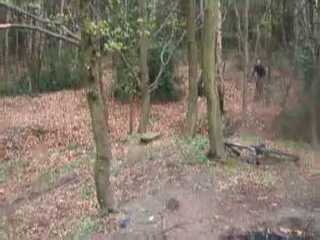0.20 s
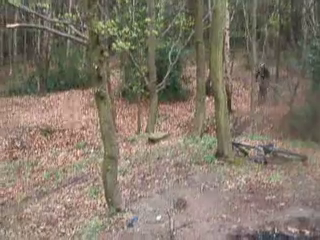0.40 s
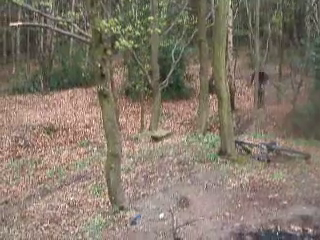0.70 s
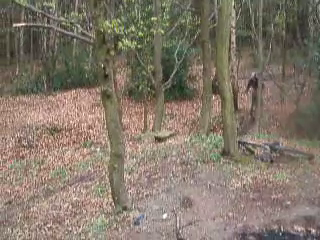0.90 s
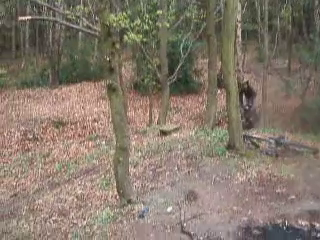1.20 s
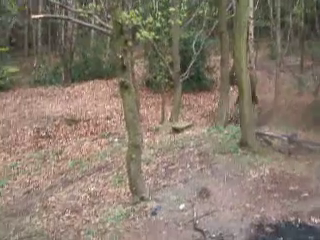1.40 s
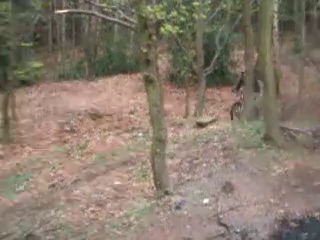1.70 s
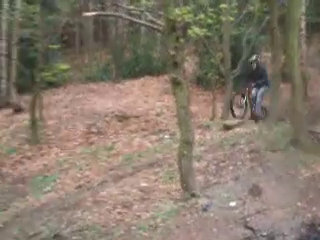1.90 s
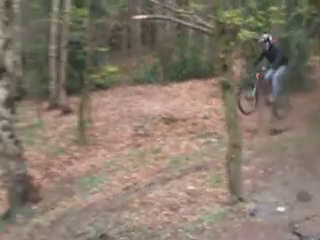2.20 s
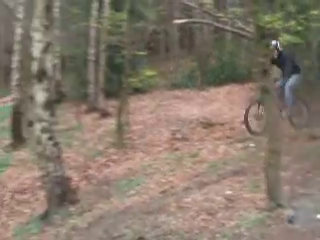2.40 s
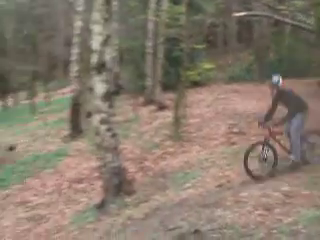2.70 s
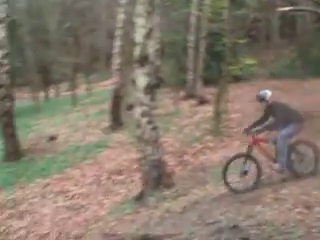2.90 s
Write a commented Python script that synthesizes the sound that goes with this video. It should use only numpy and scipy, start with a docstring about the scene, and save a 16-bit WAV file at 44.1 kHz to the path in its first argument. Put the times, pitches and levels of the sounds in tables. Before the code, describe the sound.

Quiet outdoor rumble with far birds and a low hum, soft leaf rustle midway, then near the end a bike smacks down, clacking and crunching leaves as it rolls on; hissy, muffled-treble microphone outdoors.

```python
"""A mountain bike rolls along a woodland trail and lands hard on dry leaves and soil.
The bike clacks as decaying metal modes; leaves and twigs are dense crackle and short bright noise bursts.
Breeze and tyres together are low wavering noise, with banded noise thuds where the soil takes the weight.
A bird's warbled call and a few whistles are swept sines blurred by echoes among the trees.
Behind them lie a two-partial drone, a deep murmur of noise and a steady, faint, nearly white hiss."""
import sys
import numpy as np
from scipy import signal
from scipy.fft import rfft, irfft, next_fast_len
from scipy.io import wavfile
from scipy.ndimage import uniform_filter1d, map_coordinates

SR = 44100
rng = np.random.default_rng(int(sys.argv[2]) if len(sys.argv) > 2 else 0)


def store_pcm(level_fs):
    """Save levels as 16-bit WAV."""
    pcm = np.round(np.clip(level_fs, -1, 1) * 32767).astype(np.int16)
    wavfile.write(sys.argv[1], SR, np.atleast_2d(pcm).T)


N = 133623

# knocks of the bike's frame and chain [t/s, level/dB]
BIKE_KNOCKS = [(2.075, -33.5), (2.084, -38.5), (2.8783, -13), (2.8800, -29), (2.8835, -27), (2.8888, -26)]
# ringing modes of the bike [f/Hz, level/dB, t60/s]
BIKE_MODES = [(1080, -14, 0.0088), (1660, -3.5, 0.01), (1906, -11, .014), (2143, -6.5, 0.012),
              (2440, -4, 0.012), (2730, -11, 0.0059), (3346, -6, 0.016), (3550, -8.5, 0.0097),
              (4500, -26, .03), (5270, -25.5, 0.036), (7100, -19, 0.011)]

# leaves stirred on the run-in [t/s, level/dB]
RUN_IN_RUSTLE = [(0.1, -80), (0.7, -60), (0.94, -55.5), (1.18, -57), (1.38, -51.5), (1.64, -52),
                 (1.85, -63.5), (2.04, -51), (2.12, -45.5), (2.18, -52), (2.35, -60), (2.78, -69.5)]
# tyres pressing into the leaves [t/s, level/dB, attack/s, hold/s, t60/s]
LEAF_CRUNCHES = [(2.798, -31, 0.0059, 0.022, 0.11), (2.844, -35.5, 0.0045, 0.011, 0.089),
                 (2.866, -37.5, .003, 0.02, 0.14), (2.932, -38.5, 0.044, 0.015, 0.093)]
# colour of breaking leaves [f/Hz, level/dB]
LEAF_COLOUR = [(200, -28), (600, -3), (1200, -8.5), (2400, -1), (3300, -3.5), (4500, -0.5), (5800, -4.5),
               (7200, -3), (8500, -9)]
ROLL_OUT_DB, ROLL_OUT_HOLD_S, ROLL_OUT_T60_S = -39, .15, 0.89
# twigs and dry leaves snapping [t/s, level/dB]
TWIG_SNAPS = [(0.9297, -44.5), (1.0135, -44.5), (2.119, -38), (2.382, -43), (2.388, -45), (2.5767, -45.5),
              (2.8063, -28), (2.807, -45), (2.966, -38.5), (2.981, -34)]

# low outdoor rumble, breeze and distant tyres together [t/s, level/dB]
RUMBLE_LEVEL = [(0.08, -44.5), (0.3, -46), (0.6, -44.5), (0.69, -47), (0.8, -46.5), (1.0, -48.5),
                (1.1, -45.5), (1.3, -43.5), (1.55, -46), (1.75, -47.5), (1.98, -45.5), (2.08, -46),
                (2.2, -46), (2.4, -49), (2.78, -50)]
# colour of the rumble and the close rolling [f/Hz, level/dB]
TRAIL_COLOUR = [(30, -25), (80, -19), (125, -11.5), (165, -7.5), (215, -1), (275, .5), (350, -6.5),
                (430, -5), (560, -8), (780, -11.5), (1200, -20), (2500, -39.5), (6000, -33.5)]
# soil taking the weight of the bike [t/s, level/dB, centre f/Hz, t60/s]
SOIL_THUDS = [(0.66, -41, 350, .4), (0.726, -46.5, 170, 0.5), (0.89, -44.5, 182, 0.65),
              (2.051, -40.5, 370, 0.31), (2.799, -44, 420, 0.16), (2.88, -41.5, 200, 0.18),
              (2.883, -37, 780, 0.044)]
# colour of a thud [multiple of its centre frequency, level/dB]
THUD_COLOUR = [(.2, -38), (.55, -14), (.85, 11.5), (1.2, 2), (1.9, -3.5), (4, -30), (12, -46)]
TOUCHDOWN_S, LANDED_ROLL_DB = 2.8, -51.5

# the bird's repeated call [t/s, f/Hz, level/dB], before the note's shape is applied
BIRD_CALLS = [(1.259, 3150, -50.5), (1.598, 3183, -51.5), (2.003, 3134, -53), (2.434, 3150, -55.5)]
# shape of one call [t/s from its start, pitch ratio, level/dB added]
CALL_SHAPE = [(0, 1.03, -11), (.018, 1.05, 4), (.034, .95, -6.5), (.052, .93, -0.5), (0.071, 1.005, 2),
              (0.113, 1.0, -1.5), (.135, .91, -3.5), (.165, .89, -14.5)]
# single whistles [t/s, f/Hz, length/s, level/dB, pitch flutter as a share]
BIRD_WHISTLES = [(0.865, 2710, .28, -55.5, .032), (0.953, 2793, 0.1, -59, .04),
                 (2.303, 4620, 0.15, -67, .01), (2.56, 3820, 0.1, -64, .01)]
TRILL_HZ, TRILL_DEPTH = 151, .03  # depth as a share of the pitch
BIRD_ECHO_T60_S = 1

# distant drone [t/s, level/dB]
DRONE_LEVEL = [(0.08, -47.5), (0.22, -53), (0.34, -55), (0.48, -57), (0.6, -76), (0.9, -56.5),
               (1.07, -52.5), (1.3, -50.5), (1.65, -55), (1.98, -52), (2.08, -60.5), (2.3, -54.5),
               (2.5, -61), (2.7, -62), (3.0, -52.5)]
DRONE_HZ, OCTAVE_DB = 105, -9
# colour of the deep outdoor murmur [f/Hz, level/dB]
MURMUR_COLOUR = [(20, -2), (45, -4), (90, -8.5), (200, -33.5), (1000, -74.5)]
MURMUR_DB = -73

# colour of the steady background hiss [f/Hz, level/dB]
HISS_COLOUR = [(100, -9), (1000, 1), (3000, 0.5), (5000, 0), (7500, -1.5), (9000, -4.5)]
HISS_DB = -52
# treble roll-off of the recorder [f/Hz, gain/dB]
TREBLE_ROLL_OFF = [(7200, 0), (7800, -4.5), (8300, -9.5), (8800, -23), (9100, -37.5)]
START_S, TOP_HZ = .0725, 9050  # silent up to START_S, nothing from TOP_HZ up


def amp(db):
    """Decibels to gain."""
    return 10 ** (np.asarray(db) / 20)


def unit(x):
    """Scale to rms 1."""
    return x / np.sqrt(np.mean(x ** 2) + 1e-20)


def clock():
    """Seconds at each sample."""
    return np.arange(N) / SR


def level(rows):
    """Gain per sample, gliding in dB between [t/s, level/dB] points."""
    return amp(np.interp(clock(), *np.transpose(rows)))


def wobble(rate):
    """A smooth random curve, rate knots a second."""
    return map_coordinates(rng.standard_normal(2048), [clock() * rate], mode="wrap")


def colour(x, points):
    """Filter x by [f/Hz, level/dB] points joined on a log frequency axis."""
    m = next_fast_len(N + SR // 2)
    f, db = np.transpose(points)
    log_f = np.log(np.fft.rfftfreq(m, 1 / SR) + 1)  # the 1 Hz avoids log(0)
    gain = amp(np.interp(log_f, np.log(f), db))
    return irfft(rfft(x, m) * gain, m)[:N]


def noise(points):
    """Coloured noise of rms 1."""
    return unit(colour(rng.standard_normal(N), points))


def fade(t, t60):
    """Exponential decay from t = 0, down 60 dB after t60 seconds."""
    return np.exp(-np.log(1000) * np.maximum(t, 0) / t60)


def envelope(s, attack, hold, t60):
    """Rise from time s, hold and die away."""
    t = clock() - s
    return np.clip(t / attack, 0, 1) * fade(t - attack - hold, t60)


def woods(x, t60):
    """Echoes scattered by the trunks: a decaying noise tail with a soft onset."""
    t = np.arange(SR) / SR
    tail = rng.standard_normal(SR) * fade(t, t60) * (1 - np.exp(-t / .01))
    return signal.fftconvolve(x, tail / np.linalg.norm(tail))[:N]


def bike():
    """Each knock rings the same heavily damped modes, alternating in polarity, under a short noise crack."""
    out = np.zeros(N + SR)
    t = np.arange(SR // 8) / SR
    for s, db in BIKE_KNOCKS:
        ring = np.zeros(len(t))
        for k, (hz, mode_db, t60) in enumerate(BIKE_MODES):
            gain = (-1) ** k * amp(mode_db + rng.normal(0, 1))  # modes vary a little per knock
            ring += gain * np.sin(2 * np.pi * hz * t) * fade(t, t60)
        grit = noise([(300, -15), (1200, -3), (3400, -3), (4500, -16), (9000, -29)])[:len(t)]
        crack = amp(-8) * fade(t, 0.0044) * grit
        start = round(s * SR)
        out[start:start + len(t)] += amp(db) * (ring + crack)
    return out[:N]


def crackle(per_s, spread_db, dust_db):
    """Many tiny leaf fractures of uneven size over a fine rustle, rms 1."""
    struck = rng.random(N) < per_s / SR
    size = amp(spread_db * np.minimum(rng.exponential(size=N), 3))
    cracks = struck * rng.choice([-1, 1], N) * size
    dust = amp(dust_db) * rng.standard_normal(N)
    return unit(colour(unit(cracks) + dust, LEAF_COLOUR))


def patchy(x, depth_db):
    """Each clump of leaves has its own colour for a few milliseconds."""
    z = signal.stft(x, nperseg=256)[2]
    field = uniform_filter1d(rng.standard_normal(z.shape), size=5, axis=0)  # across frequency
    field = uniform_filter1d(field, size=3, axis=1)  # across time
    gain = unit(amp(depth_db * unit(field)))
    return signal.istft(z * gain, nperseg=256)[1][:N]


def leaves():
    """Leaf fractures make a far rustle on the run-in, crunches under the tyres and a crackling roll-out."""
    far_sway = amp(1.5 * wobble(44.72))
    far = level(RUN_IN_RUSTLE) * far_sway * crackle(per_s=700, spread_db=0.5, dust_db=-1.5)
    press = sum(amp(db) * envelope(s, attack, hold, t60)
                for s, db, attack, hold, t60 in LEAF_CRUNCHES)
    crunch = press * crackle(per_s=4500, spread_db=3, dust_db=-5)
    trail_off = amp(ROLL_OUT_DB) * envelope(TOUCHDOWN_S, .03, ROLL_OUT_HOLD_S, ROLL_OUT_T60_S)
    roll_out = trail_off * crackle(per_s=1500, spread_db=3.0, dust_db=-3.5)
    return far + patchy(crunch + roll_out, depth_db=3)


def twigs():
    """Brittle snaps: near-instant bursts of bright noise."""
    snaps = sum(amp(db) * envelope(s, 0.00022, 0.001, 0.018) for s, db in TWIG_SNAPS)
    return snaps * noise([(500, -20.5), (2000, -7.5), (4500, -1), (6800, -2), (9000, -10.5)])


def thuds():
    """Soil takes the weight: short noise bursts peaking near each thud's centre frequency."""
    out = np.zeros(N)
    for s, db, hz, t60 in SOIL_THUDS:
        body = noise([(hz * ratio, gain_db) for ratio, gain_db in THUD_COLOUR])
        out += amp(db) * envelope(s, .006, 0.0042, t60) * body
    return out


def breeze_and_tyres():
    """Low noise for breeze and distant tyres, close rolling after touchdown, and thuds on the soil."""
    rumble = level(RUMBLE_LEVEL) * amp(0.62 * wobble(21.9)) * noise(TRAIL_COLOUR)
    landed = amp(LANDED_ROLL_DB) * envelope(TOUCHDOWN_S, .01, 1, 1) * noise(TRAIL_COLOUR)
    return rumble + landed + thuds()


def bird_calls():
    """A repeated call: a sine bent along the note's shape, with a fast trill and random waver."""
    song = np.zeros(N)
    at, ratio, shape_db = np.transpose(CALL_SHAPE)
    for s, hz, db in BIRD_CALLS:
        t = clock() - s
        trill = TRILL_DEPTH * np.sin(2 * np.pi * TRILL_HZ * t)
        pitch = hz * np.interp(t, at, ratio) * (1 + trill + 0.00788 * wobble(60))
        loudness = amp(db + np.interp(t, at, shape_db) + 2.4 * wobble(30.63))
        sounding = (t > 0) * (t < at[-1])
        song += loudness * sounding * np.sin(2 * np.pi * np.cumsum(pitch) / SR)
    return song


def bird_whistles():
    """Single whistles: sines with a random pitch flutter that swell and sink."""
    song = np.zeros(N)
    for s, hz, length, db, flutter in BIRD_WHISTLES:
        swell = np.sqrt(np.abs(np.sin(np.pi * np.clip((clock() - s) / length, 0, 1))))
        pitch = hz * (1 + flutter * wobble(200))
        song += amp(db) * swell * np.sin(2 * np.pi * np.cumsum(pitch) / SR)
    return song


def bird():
    """Far calls and whistles, blurred by strong echoes from the trees."""
    song = bird_calls() + bird_whistles()
    return amp(1) * song + amp(2.0) * woods(song, BIRD_ECHO_T60_S)


def drone():
    """A low hum, as of a far engine: a fundamental and its octave, wavering in pitch and level."""
    pitch = DRONE_HZ * (1 + .024 * wobble(18))
    phase = 2 * np.pi * np.cumsum(pitch) / SR
    hum = np.sqrt(2) * (np.sin(phase) + amp(OCTAVE_DB) * np.sin(2 * phase))  # fundamental at rms 1
    return level(DRONE_LEVEL) * amp(0.76 * wobble(12)) * hum


def murmur():
    """The ground's deep, steady murmur as very low noise."""
    return amp(MURMUR_DB) * noise(MURMUR_COLOUR)


def scene():
    """Bike, leaves and twigs with a faint woodland echo, then breeze and tyres, bird, drone and murmur."""
    ride = bike() + leaves() + twigs()
    echo = amp(-16) * woods(ride, t60=.5)
    return (ride + echo + breeze_and_tyres() + bird() + drone() + murmur())[None]


def record(dry):
    """Sound starts after a moment of silence, over a steady hiss, with dulled treble and its top cut off."""
    x = (dry[0] + amp(HISS_DB) * noise(HISS_COLOUR)) * (clock() > START_S)
    m = next_fast_len(N + SR // 2)
    spectrum = rfft(colour(x, TREBLE_ROLL_OFF), m)
    passed = np.fft.rfftfreq(m, 1 / SR) < TOP_HZ
    return irfft(spectrum * passed, m)[None, :N]


dry = scene()
out = record(dry)
store_pcm(out)
```